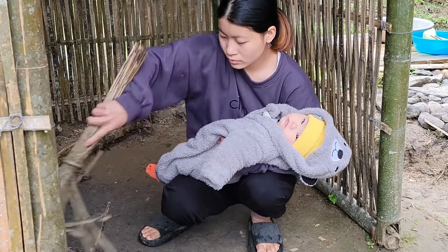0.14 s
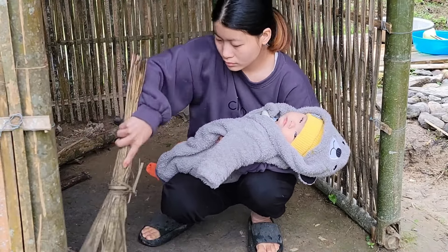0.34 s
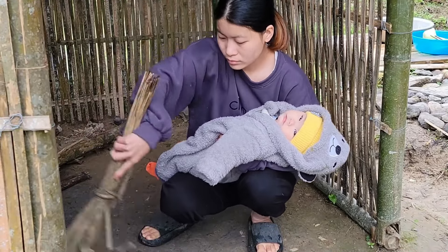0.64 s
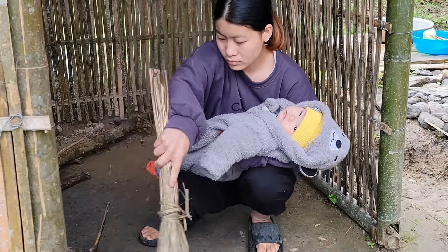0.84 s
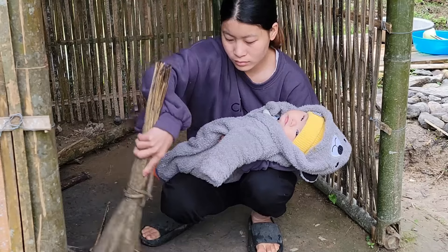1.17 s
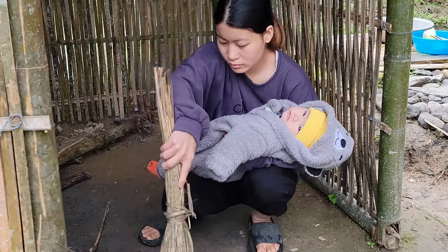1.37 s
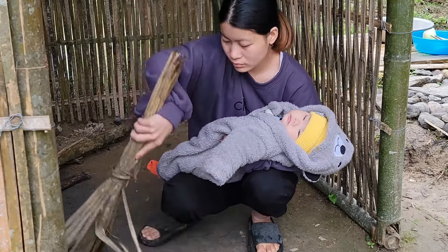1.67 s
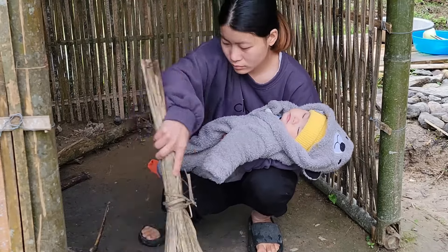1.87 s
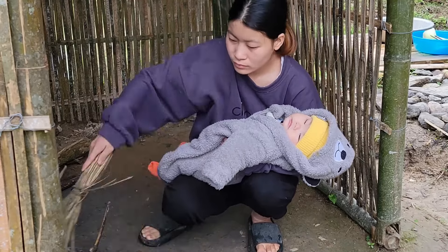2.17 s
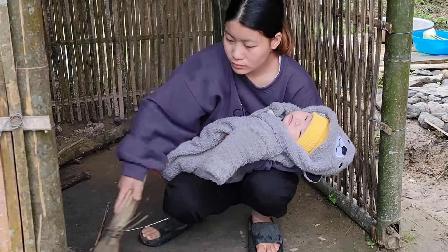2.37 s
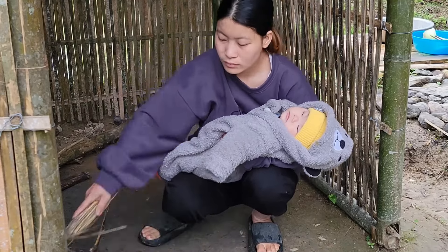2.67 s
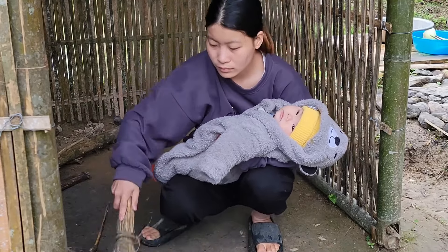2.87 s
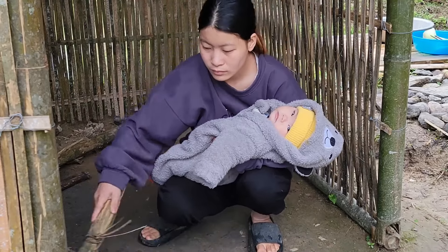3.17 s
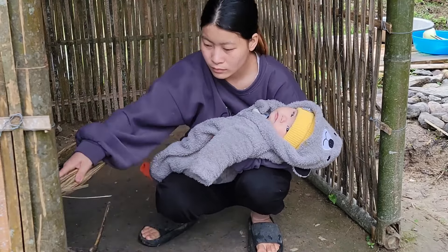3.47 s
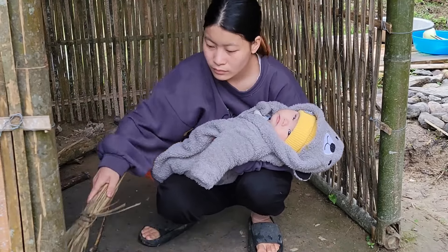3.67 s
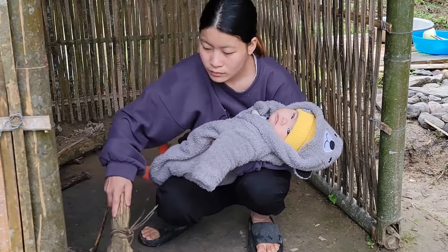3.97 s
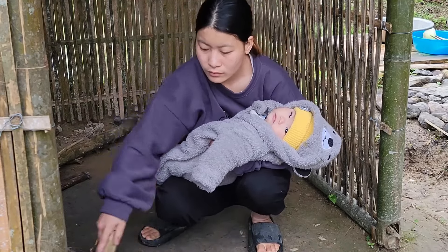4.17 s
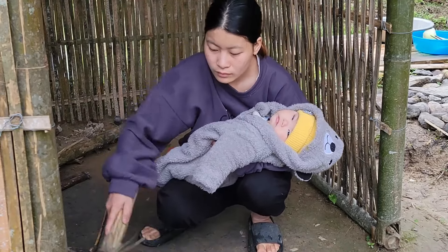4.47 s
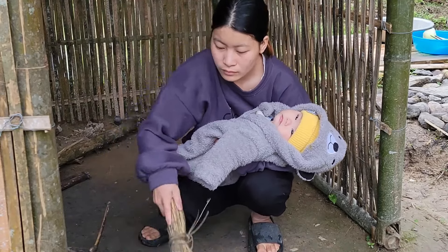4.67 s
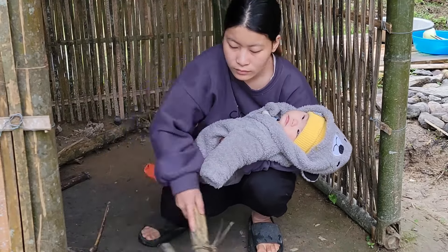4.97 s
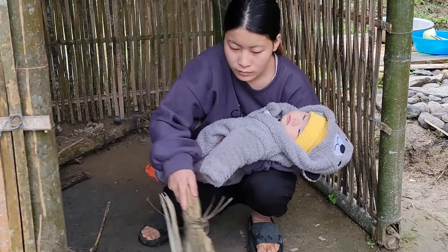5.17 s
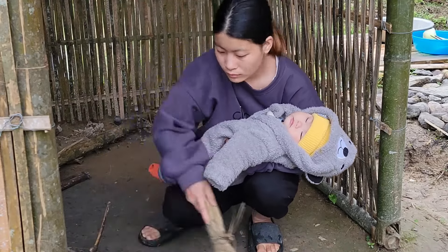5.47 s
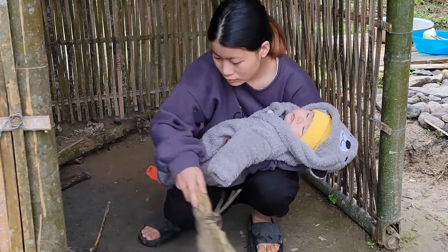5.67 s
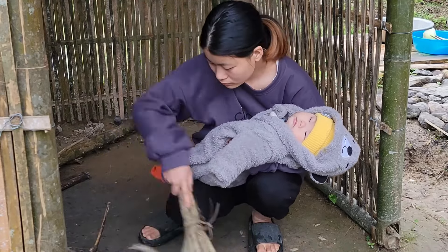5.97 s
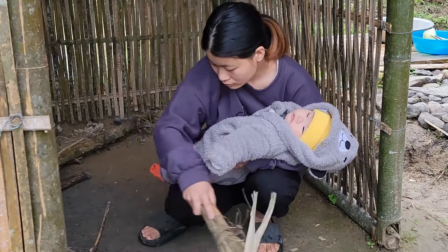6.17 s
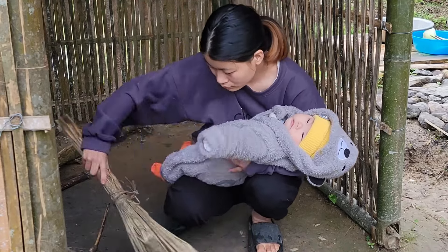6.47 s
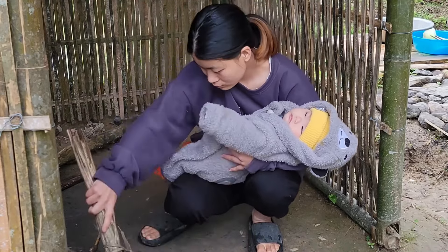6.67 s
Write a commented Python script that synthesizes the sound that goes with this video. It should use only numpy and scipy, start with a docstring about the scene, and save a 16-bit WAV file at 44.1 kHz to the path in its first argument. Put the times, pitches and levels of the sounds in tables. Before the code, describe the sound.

A bundle of dry stalks rasps over a hard earth floor, bright and gritty, in irregular pushes with short gaps. Small stalks tick and snap. Midway, bamboo pieces rattle and knock sharply, then softer knocks and low thuds follow among the strokes. The last sweeps are broad and strongest. Quiet outdoor air and a low distant motor lie underneath; near stereo pickup, almost no echo.

```python
"""A short broom of dry stalks sweeps a packed earth floor in an open slatted hut: noise bands and ringing
stalks under a curve of pushes. Loose bamboo is dragged and knocked about: struck modes and noise cracks.
Single stalks snap free and the broom head thumps the earth; short feedback delays reflect these and the knocks.
A small engine drones far away, three sines on its firing rate, over quiet air of banded noise."""
import sys
import numpy as np
from scipy import signal
from scipy.io import wavfile

SR = 44100
rng = np.random.default_rng(int(sys.argv[2]) if len(sys.argv) > 2 else 0)


def master_out(mix):
    """Clip the mix to full scale and print it as 16-bit PCM to the path in sys.argv[1]."""
    frames = np.transpose(np.atleast_2d(mix))
    ceiling = np.clip(frames, -1, 1)
    pcm = np.round(ceiling * 32767).astype(np.int16)
    wavfile.write(sys.argv[1], SR, pcm)


def field_ratio(decibels):
    """Amplitude ratio for a level in dB (20 dB per decade); scalars and array-likes work."""
    return 10 ** (np.asarray(decibels, dtype=float) / 20)


N = 301188

# stalk tips on earth, relative spectrum: hz [Hz], density_db [dB per Hz]
TIP_SPECTRUM = [(150, -58), (250, -28), (298, -6.5), (452, -37.5), (640, 4), (735, -3.5), (2670, 3.5),
                (5830, 3), (8260, 8.5), (11300, 1), (14900, 6), (16000, -17)]
# left-right likeness of diffuse sound: hz [Hz], correlation [-1 to 1]
STEREO_LIKENESS = [(60, 1), (150, 0.95), (380, 0.9), (950, 0.67), (2380, 0.89), (5980, 0.17),
                   (15000, -0.008)]


def rms_one(x):
    """Scale to rms 1."""
    return x / np.sqrt(np.mean(x ** 2) + 1e-20)


def in_time(rows):
    """Columns of a curve, one value a sample."""
    s, *columns = np.transpose(rows)
    return [np.interp(np.arange(N) / SR, s, c) for c in columns]


def at_hz(points, hz):
    """Read a spectrum on a log frequency axis."""
    points_hz, values = np.transpose(points)
    return np.interp(np.log(hz), np.log(points_hz), values)


def drift(corner_hz):
    """Slow chance of rms 1: coarse noise through a double one-pole low-pass."""
    step = 40  # samples per coarse value
    r = np.exp(-2 * np.pi * corner_hz * step / SR)
    noise = rng.standard_normal(N // step + 2002)
    slow = signal.lfilter([1], [1, -2 * r, r * r], noise)[2000:]  # settled part
    return np.interp(np.arange(N) / step, np.arange(len(slow)), rms_one(slow))


def fade(x, t60_s):
    """Each impulse becomes a step that dies away exponentially."""
    return signal.lfilter([1], [1, -field_ratio(-60 / (t60_s * SR))], x + 1e-18)


def ring(clicks, hz, t60_s):
    """Two-pole resonator: a unit click starts a dying sine of nominal height 1."""
    r, w = field_ratio(-60 / (t60_s * SR)), 2 * np.pi * hz / SR
    return signal.lfilter([0, np.sin(w)], [1, -2 * r * np.cos(w), r * r], clicks + 1e-18)


def slips(per_s, spread_db):
    """Random stick-slip impulses, exponential spread in dB: above 1 if spread_db is positive, else below."""
    sizes = field_ratio(spread_db * np.minimum(rng.exponential(1, N), 5))
    return sizes * (rng.random(N) < per_s / SR)


def bandpass(x, order, band_hz):
    """Butterworth band-pass."""
    return signal.sosfilt(signal.butter(order, band_hz, "band", fs=SR, output="sos"), x)


def spread(mid, side, hz):
    """Mix two unrelated signals to left and right with the likeness found at hz."""
    alike = np.clip(at_hz(STEREO_LIKENESS, hz), -.99, .99)
    return np.sqrt(1 + alike) * mid + np.sqrt(1 - alike) * side * [[1], [-1]]


def coloured(grain, spectrum, patchy_db, low_lift_db=0, hump_db=0, hump_hz=3000):
    """Half-octave stereo noise bands under one grain, each with own level and likeness; they share five flickers."""
    out, edges_hz = 0, 22 * 2 ** np.arange(0, 9.6, .5)
    white = rng.standard_normal((2, 2, N)) * grain  # neighbouring bands get unrelated noise
    flicker = [drift(19.4) + 0.36 * drift(4.4) for k in range(5)]
    for k, (low, high) in enumerate(zip(edges_hz, edges_hz[1:])):
        hz = np.sqrt(low * high)
        if hz < spectrum[0][0]:
            continue
        mid, side = bandpass(white[k % 2], 2, [low, high])
        # pressing harder bends whole stalks: more low scrape
        lift = low_lift_db * min(np.log2(9000 / hz) / 2, 1.5)
        hump = hump_db / (1 + (np.log2(hz / hump_hz) / 0.64) ** 2)
        gain = field_ratio(at_hz(spectrum, hz) + lift + hump + patchy_db * flicker[k % 5])
        out = out + gain * spread(mid, side, hz)
    return out


def broom():
    """Slips of the tips puff over the smooth hiss of moving dust; stalks ring and stiff ones tick over stones."""
    # how the broom is held: start_s [s], scrape_centre_hz [Hz], low_scrape_db [dB], left_right_db [dB]
    grip = [(0, 3200, 0.5, -0.5), (.5, 2960, 2, -.5), (1, 3600, 1, -.7), (1.5, 3500, 1, -.7),
            (2, 3090, 1, -.7), (2.5, 3320, 2.5, 0), (3, 2640, -0.5, -0.5), (3.36, 2560, -4, 0.5),
            (3.45, 2470, 8, 0), (3.9, 2220, 2.5, -.3), (4.05, 2260, 1.5, -1), (4.17, 2300, -6, -1),
            (4.36, 2330, 2.5, -.7), (4.5, 2380, -3, -1), (4.71, 2490, 2.5, -1.2), (4.95, 2470, -7.5, -1),
            (5.1, 2400, 1.5, -1.3), (5.6, 2660, 1.5, -1.5), (6.1, 2700, 1, -1.5), (6.83, 2447, 0, -1.3)]
    rasp_db = pushing()
    centre_hz, low_db, pan_db = in_time(grip)
    low_follows, mean_rasp_db = 0.071, -42.5  # dB of low scrape per dB of rasp over the mean
    puffs = rms_one(fade(slips(550, spread_db=-12.0), 0.015))
    grain = (6.0 + .5 * puffs) * field_ratio(0.82 * drift(28))
    low_lift_db = low_db + low_follows * (rasp_db - mean_rasp_db)
    rasp = rms_one(coloured(grain, TIP_SPECTRUM, patchy_db=1.5, low_lift_db=low_lift_db,
                            hump_db=5.0, hump_hz=centre_hz))
    stalks = field_ratio(-10.5) * twangs(2500, cycles=67.0)
    ticks = field_ratio(-16) * rms_one(bandpass(twangs(120, cycles=13.6), 2, (1410, 3400)))
    level = field_ratio(rasp_db + pan_db / 2 * np.array([[1], [-1]]))
    return level * (rasp + stalks + ticks)


def pushing():
    """Rasp level in dB: each push lands, swells, eases and lifts; the strongest one leads."""
    # pushes of the broom: touch_s [s], swell_s [s], ease_s [s],
    # touch_db [dB], fullest_db [dB], lift_db [dB]
    pushes = [(0.0, 0.04, .006, -46.5, -48, -44), (.352, 0.019, 0.042, -50, -40, -46.5),
              (.42, 0.052, 0.065, -46.5, -42.5, -51), (.757, 0.21, 0.02, -47, -38, -41),
              (1.1, 0.015, 0.005, -70, -46, -49), (1.235, 0.062, 0.14, -54.5, -44.5, -48.5),
              (1.46, 0.055, 0.061, -51, -41, -46), (1.832, 0.037, 0.11, -48.5, -39, -39.5),
              (2.001, 0.033, 0.012, -43.5, -41, -44.5), (2.372, 0.072, 0.1, -50.5, -41.5, -40.5),
              (2.76, 0.15, 0.086, -61.5, -39.5, -43.5), (3.03, 0.059, 0.13, -52, -51.5, -63),
              (3.26, 0.038, 0.063, -56.5, -53, -52.5), (3.37, 0.063, 0.018, -49, -38, -43.5),
              (3.86, 0.031, .03, -68, -47, -44), (3.92, 0.065, 0.11, -47, -42.5, -51),
              (4.118, 0.056, 0.075, -52.5, -44.5, -47.5), (4.25, .12, 0.12, -47.5, -41, -50),
              (4.478, 0.26, 0.053, -53.5, -37, -41), (4.886, 0.029, 0.034, -45, -42.5, -46),
              (4.94, 0.028, .02, -42.5, -39.5, -39), (4.979, .12, 0.1, -42, -36, -45.5),
              (5.368, 0.013, 0.027, -79, -50.5, -59), (5.418, .13, 0.1, -62.5, -37.5, -45),
              (5.94, 0.14, 0.12, -63, -35.5, -38), (6.569, 0.12, 0.16, -60.5, -32.5, -42.5)]
    still_db = -74.5  # the broom rustling in the air
    land_db_per_s, lift_db_per_s = 902, 298
    nearing_db, nearing_db_per_s = -12.5, 83  # loose stalks rustle as the broom comes down
    settle_db, settle_db_per_s = -16.5, 69  # grit and dust settle after the lift
    swell_bend = 1.23  # a push gains fastest at first
    t, level_db = np.arange(N) / SR, np.full(N, still_db)
    for touch_s, swell_s, ease_s, touch_db, full_db, lift_db in pushes:
        early_s, late_s = touch_s - t, t - (touch_s + swell_s + ease_s)
        before = touch_db + np.maximum(-land_db_per_s * early_s, nearing_db - nearing_db_per_s * early_s)
        after = lift_db + np.maximum(-lift_db_per_s * late_s, settle_db - settle_db_per_s * late_s)
        swell = full_db - (full_db - touch_db) * np.clip(1 + early_s / swell_s, 0, 1) ** swell_bend
        ease = (lift_db - full_db) * np.clip(1 + late_s / ease_s, 0, 1)
        push_db = np.where(early_s > 0, before, np.where(late_s > 0, after, swell + ease))
        level_db = np.maximum(level_db, push_db)
    return level_db


def twangs(per_s, cycles):
    """Slips set stalks ringing, each at one of 30 pitches, dying 60 dB in a set number of cycles."""
    plucks = slips(per_s, spread_db=2.0) * rng.standard_normal((2, N))
    pitches_hz = np.geomspace(800, 14000, 30) * rng.uniform(.97, 1.03, 30)
    dealt = rng.integers(0, 30, N)
    out = np.zeros((2, N))
    for k, hz in enumerate(pitches_hz):
        mid, side = ring(plucks * (dealt == k), hz, cycles / hz)
        out += field_ratio(at_hz(TIP_SPECTRUM, hz)) * hz * spread(mid, side, hz)
    return rms_one(out)


def bamboo():
    """Blows and dragging ring the same modes; a blow is a rattle of contacts, a hard one reaches high modes."""
    # modes: pitch_hz [Hz], side_db [dB, struck on the side], end_db [dB, struck on the end], t60_s [s]
    modes = [(542.8, -6.5, 1.5, 0.047), (644, -8, 4.5, 0.068), (760.7, 1.5, -19, 0.07),
             (834, -0.5, -2, 0.067), (958.5, -3, 13, 0.08), (1100, 1.5, -27, 0.05), (1254, -1, 5.5, 0.058),
             (1351, 0, 13.5, 0.03), (1720, -1.5, 8, 0.09), (2108, -0.5, 7, 0.04), (2634, 0, 5.5, 0.045),
             (2960, 0, 3, 0.04), (3453, -1, 6, 0.1), (3643, 1, -5.5, 0.05), (4100, 3, -21, 0.057),
             (4170, -7, -3, 0.043), (4970, -17, -13, .035), (5200, -10, -11, .04), (6500, -15, -14, .03)]
    # blows: start_s [s], drive_db [dB], end [0 side to 1 end], hardness [0-2], rattle_t60_s [s]
    blows = [(2.96, -39, 0.49, 0.32, 0.018), (3.002, -41.5, 0.76, 0.45, 0.015),
             (3.101, -43, 0.94, 0, 0.049), (3.32, -52, 0.45, 0.33, 0.032), (3.355, -42, 0.43, 0.15, 0.041),
             (3.407, -29.5, 0.69, 0.73, 0.033), (3.427, -29.5, 0.48, 1, 0.036),
             (3.452, -36, 0.77, 0.58, 0.034), (3.503, -23, 0.085, 0.37, .006),
             (3.568, -33.5, 0.74, 1.36, 0.014), (3.577, -34.5, .95, 0, 0.015),
             (3.606, -21, 0.19, 0.73, .008), (3.732, -52.5, 0.41, 0.1, 0.007),
             (3.786, -49.5, 0.65, 0, 0.0093), (4.024, -35, 1, 0.55, 0.1), (4.308, -46, 0.63, .4, .04),
             (4.364, -35, 0.97, 0.71, 0.049), (4.39, -35.5, 0.44, 0.66, 0.029),
             (4.889, -47, 0.28, 0, 0.057)]
    # dragging along the floor: fullest_s [s], drive_db [dB], rise [dB/s], fall [dB/s]
    drags = [(2.933, -50.5, 290, 173), (3.108, -51.5, 802, 670), (3.32, -55.5, 580, 119),
             (3.441, -41.5, 308, 525), (4.364, -49, 183, 380), (4.892, -59, 1113, 120)]
    damping_db_per_octave = -1.5  # the ground damps the high modes
    lag_s, one_sided_hz = .00008, 1420

    contacts = slips(2500, spread_db=2.5) * rng.choice([-1, 1], N)
    rub, t = np.zeros(N), np.arange(N) / SR
    for s, db, rise, fall in drags:
        rub += field_ratio(db - np.where(t < s, rise * (s - t), fall * (t - s)))

    hz, side_db, end_db, t60_s = np.transpose(modes)
    sign = (-1) ** np.arange(len(hz))
    clicks = np.array([np.roll(contacts, 97 * k) * rub * field_ratio(db - 25.5) for k, db in enumerate(end_db)])
    cracks, after = np.zeros(N), np.arange(3000)
    for s, drive_db, end, hard, rattle_s in blows:
        at, end, hard = round(s * SR), np.clip(end, 0, 1), np.clip(hard, 0, 2)
        rattle = 0.14 * contacts[at + after] * field_ratio(-60 * after / SR / max(rattle_s, .001))
        rattle[0] = 1
        dulling_db = (damping_db_per_octave - (1 - hard) * 12) * np.log2(hz / 800)
        # the side response counts 3 to 4 times over
        strength = field_ratio(drive_db - 5.5 + (4.0 - end) * side_db + end * end_db + dulling_db)
        clicks[:, at + after] += np.outer(strength * sign, rattle)
        cracks[at] = field_ratio(drive_db - 5.0) * hard

    # low modes reach the right side later; high modes beam each their own way
    lags_s = lag_s * np.where(hz < one_sided_hz, 1, sign * one_sided_hz / hz)
    out = np.zeros((2, N))
    for click, mode_hz, ring_s, late_s in zip(clicks, hz, t60_s, lags_s):
        mode = ring(click, mode_hz, ring_s)
        out += [mode, np.interp(t - late_s, t, mode)]

    # splinters and grit
    crack_level = fade(cracks, 0.088) + field_ratio(-10) * fade(cracks, 0.13) + 0.4 * fade(cracks, 0.008)
    grit = (crack_level + field_ratio(1) * rub) * rng.standard_normal((2, N))
    out += bandpass(grit, 3, [1400, 5400])
    # a thin tube sends out no bass
    return signal.sosfilt(signal.butter(6, 490, "high", fs=SR, output="sos"), out)


def snaps():
    """A freed stalk: a short hiss, unrelated left and right, that sets off a brief ring."""
    # single stalks that snap free: start_s [s], drive_db [dB], ring_hz [Hz]
    freed = [(0.355, -41, 1900), (0.757, -41, 2930), (1.1104, -44, 3600), (1.2331, -55, 2570),
             (1.444, -52, 2600), (1.624, -52, 5400), (1.8282, -49, 2290), (2.0276, -31, 3560),
             (2.301, -53, 2200), (2.3725, -52, 4150), (3.8721, -56, 1854), (4.8864, -49.5, 2587),
             (5.208, -42, 1600), (5.263, -58, 3000), (5.294, -61, 2600), (5.3743, -48, 2535),
             (5.7464, -65, 2296), (5.796, -49, 2617), (5.8308, -59.5, 2730), (6.0168, -31.5, 2520),
             (6.3133, -48, 2927), (6.3555, -49, 2770), (6.3794, -64, 3610), (6.4393, -53, 2555),
             (6.5063, -59, 2010)]
    decay_t60_s, rise_t60_s, ring_t60_s = 0.046, 0.0068, 0.028
    out = np.zeros((2, N))
    hiss = signal.lfilter([1, -.7], [1], rng.standard_normal((2, N)))
    for s, db, hz in freed:
        click = np.zeros(4000)
        click[0] = field_ratio(db)
        at = round(s * SR)
        span = slice(at, at + len(click))
        burst = (fade(click, decay_t60_s) - fade(click, rise_t60_s)) * hiss[:, span]
        out[:, span] += burst + field_ratio(-18.5) * ring(burst, hz, ring_t60_s)
    return out


def thuds():
    """Packed earth answers a push with a dull low ring that swells and dies: two resonators in series."""
    # the broom head thumps the earth: start_s [s], drive_db [dB]
    thumps = [(0.924, -52), (3.411, -49), (4.023, -40.5), (4.301, -46.5), (4.364, -42.5), (4.697, -42),
              (5.101, -47)]
    earth_hz, t60_s = 269, 0.066
    s, db = np.transpose(thumps)
    push = np.zeros(N)
    push[(s * SR).astype(int)] = field_ratio(db)
    first = ring(push, earth_hz, t60_s)
    return ring(first, earth_hz * 1.234, t60_s) * earth_hz / SR


def hut(x):
    """Four short feedback delays a side, duller on every round, stepped block by block."""
    t60_s, wall_cut_hz = 0.15, 15000
    out, dull = np.zeros((2, N)), np.exp(-2 * np.pi * wall_cut_hz / SR)
    lags = (np.geomspace(.011, .024, 8) * SR).astype(int)  # samples
    for k, lag in enumerate(lags):
        loop, gain, state = x.copy(), field_ratio(-60 * lag / SR / t60_s), [0.]
        for i in range(lag, N, lag):
            back, state = signal.lfilter([gain * (1 - dull)], [1, -dull], loop[i - lag:i], zi=state)
            loop[i:i + lag] += back[:N - i]
        out[k % 2] += (loop - x) * (-1) ** (k // 2)
    return out


def engine():
    """Three low orders of the firing rate, each as loud as its pitch carries, wavering with the air between."""
    # the far engine: start_s [s], firing_hz [Hz], level_db [dB, before carry]
    firing = [(0.0, 51.9, -57), (0.19, 50.24, -58.5), (0.7, 55.0, -58), (1.25, 59.97, -62.5),
              (2.34, 66.9, -60), (2.99, 68.85, -58.5), (3.73, 68.5, -59.5), (4.2, 65.7, -57),
              (4.72, 63.57, -62), (4.96, 63.4, -57.5), (6.24, 63.03, -60), (6.41, 61.95, -67),
              (6.68, 62.8, -57), (6.83, 61.7, -57)]
    # how well a pitch carries this far: pitch_hz [Hz], gain_db [dB]
    carry = [(50, -31), (61, -24), (64, -4), (69, -5), (100, 0), (138, -0.5), (152, -10.5), (190, -8),
             (198, -24), (207, -39)]
    hz, db = in_time(firing)
    phase = 2 * np.pi * np.cumsum(hz * (1 + 0.003 * drift(4.3))) / SR
    out = np.zeros(N)
    for k in range(1, 4):
        order_db = db + at_hz(carry, k * hz) + 0.16 * drift(14.0)
        out += np.sqrt(2) * field_ratio(order_db) * np.sin(k * phase)
    return out


def quiet_air():
    """Broad background noise, coloured by band and flickering."""
    # air, relative spectrum: hz [Hz], density_db [dB per Hz]
    air_spectrum = [(15, -35), (25, -29), (87, 9.5), (153, -6), (195, -10), (285, -10.5), (503, -25),
                    (677, -17.5), (1290, -29.5), (2910, -26.5), (5430, -27), (5880, -52.5), (11300, -61.5),
                    (14800, -59), (16000, -54)]
    return field_ratio(-59) * rms_one(coloured(1, air_spectrum, patchy_db=3.0))


def scene():
    """Broom and bamboo close by, the engine and the air all round."""
    sweeping = broom()
    knocks = bamboo() + snaps() + thuds()
    walls = field_ratio(-17.5) * hut(knocks.mean(axis=0))
    knocks_placed = knocks * field_ratio([[-.6], [.6]])  # dB left, right
    engine_placed = engine() * field_ratio([[.2], [-.2]])
    return sweeping + knocks_placed + walls + engine_placed + quiet_air()


def band_limit(x):
    """A steep low-pass at the top of the band."""
    return signal.sosfilt(signal.butter(12, 16680, fs=SR, output="sos"), x)


def record(dry):
    """The sound reaches the right side 3 samples late; a steep low-pass cuts the top."""
    late = np.stack([dry[0], np.roll(dry[1], shift=3)])
    top_cut = signal.cheby2(12, 60, 15950, fs=SR, output="sos")  # 60 dB down from 15950 Hz
    mix = signal.sosfilt(top_cut, late)
    return band_limit(mix)


dry = scene()
out = record(dry)
master_out(out)
```